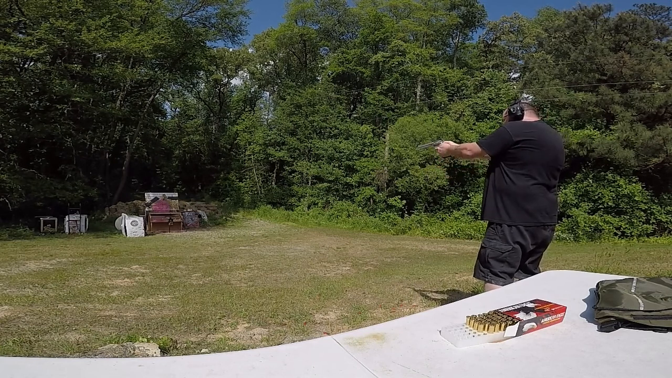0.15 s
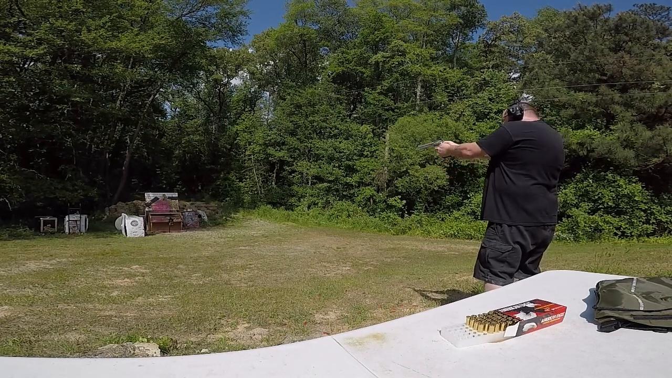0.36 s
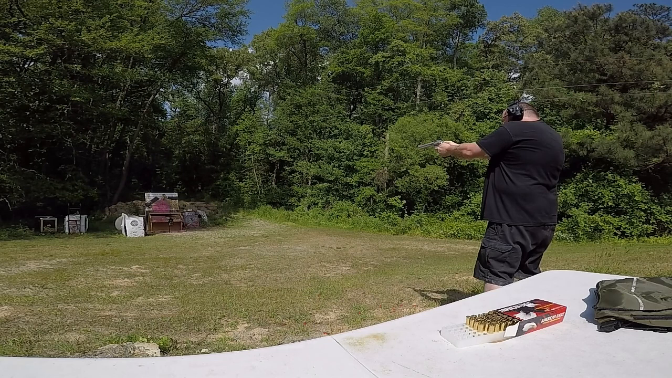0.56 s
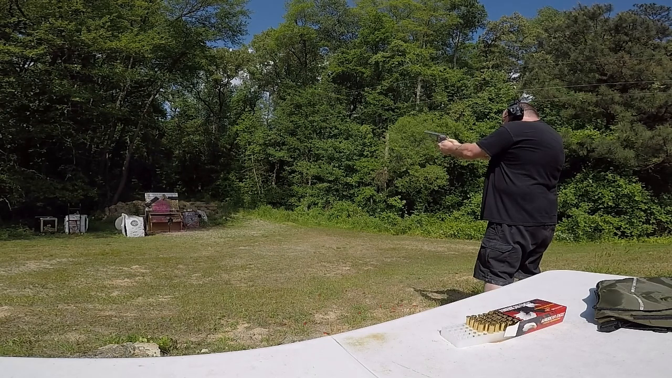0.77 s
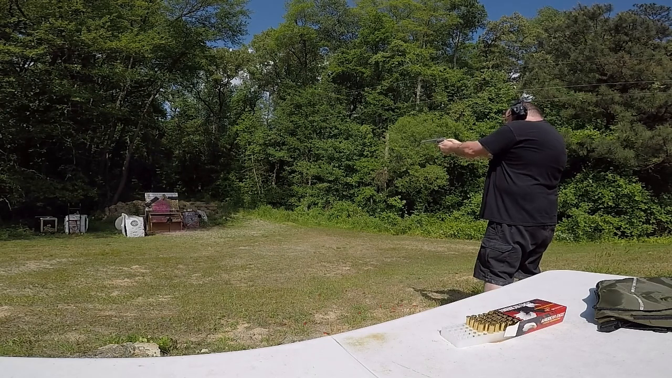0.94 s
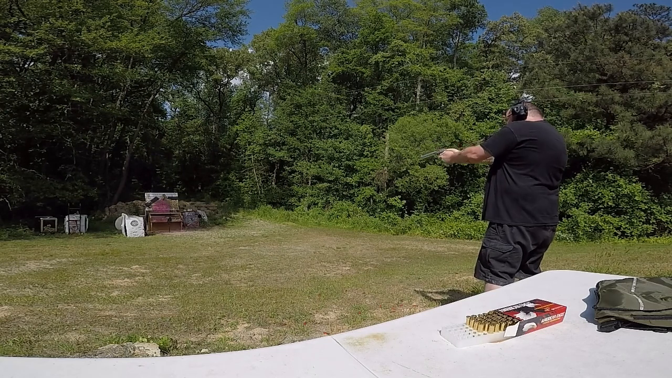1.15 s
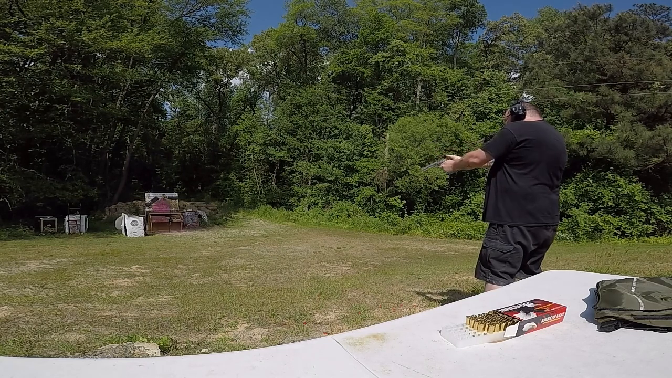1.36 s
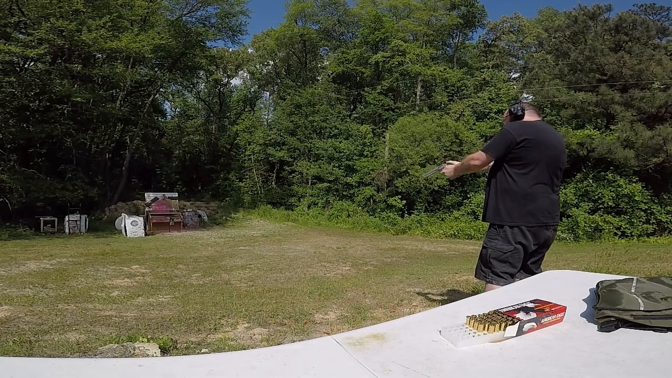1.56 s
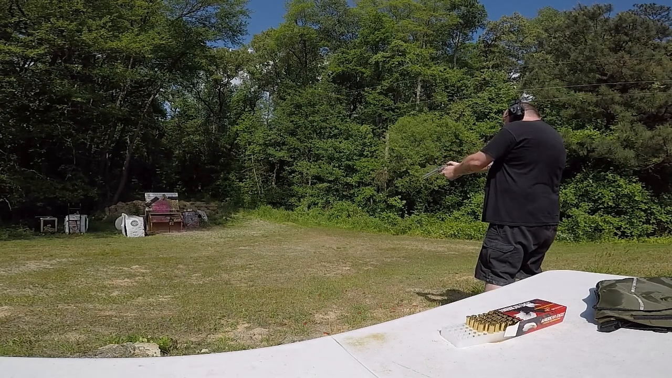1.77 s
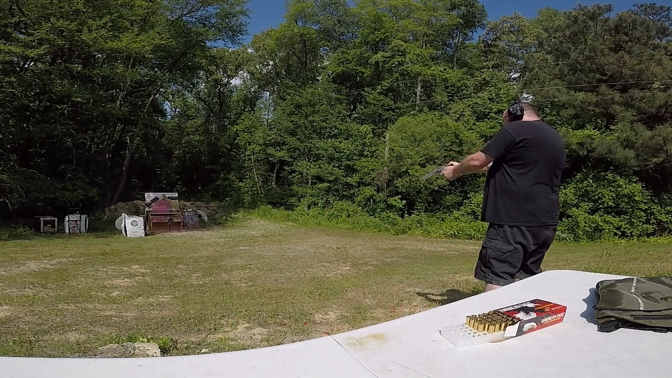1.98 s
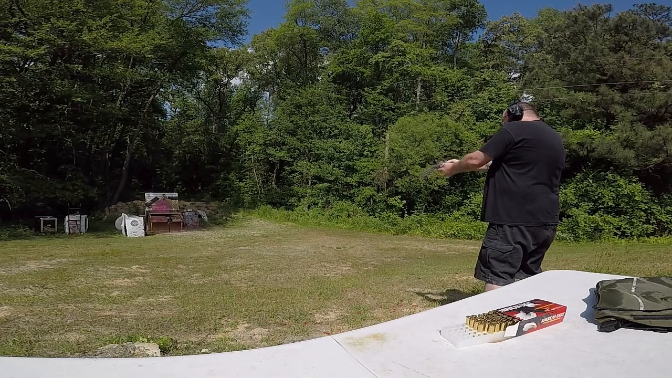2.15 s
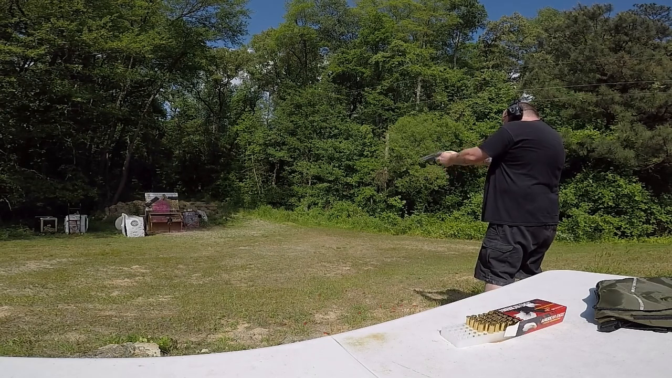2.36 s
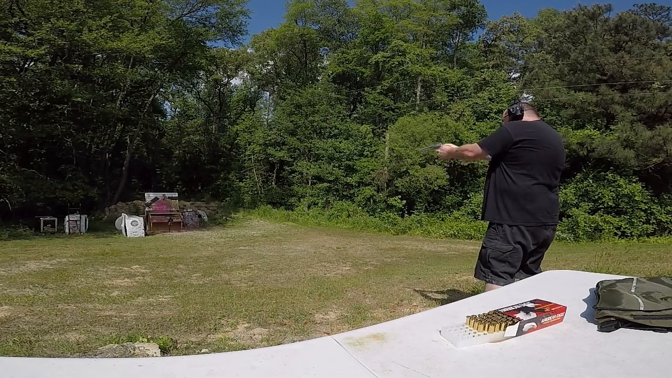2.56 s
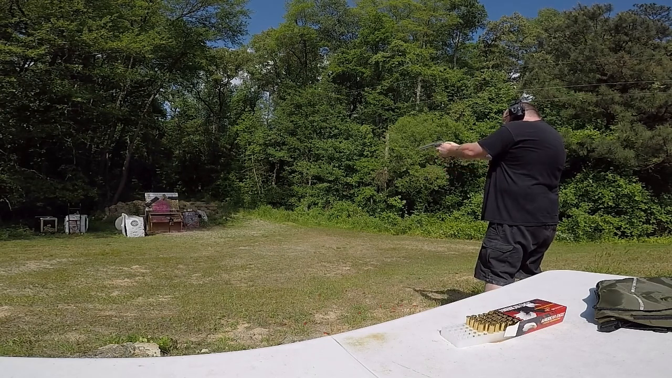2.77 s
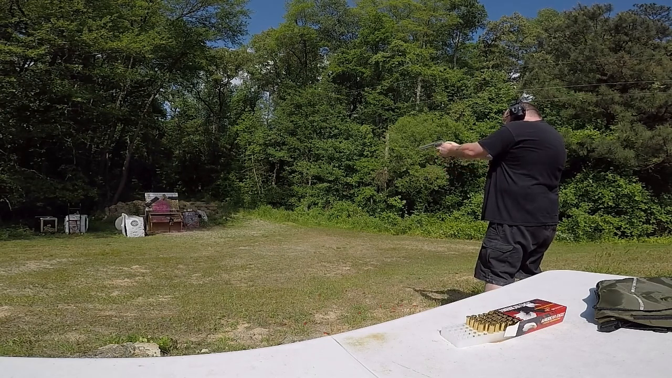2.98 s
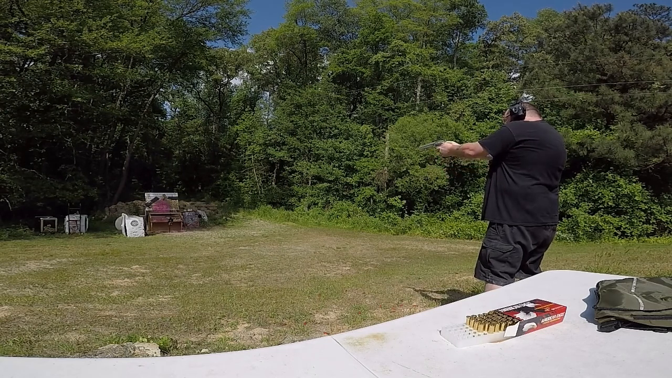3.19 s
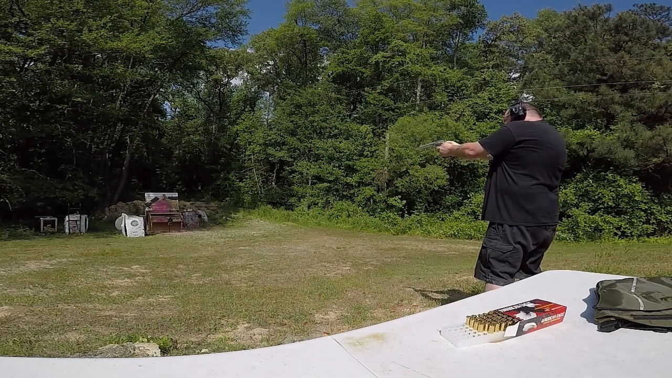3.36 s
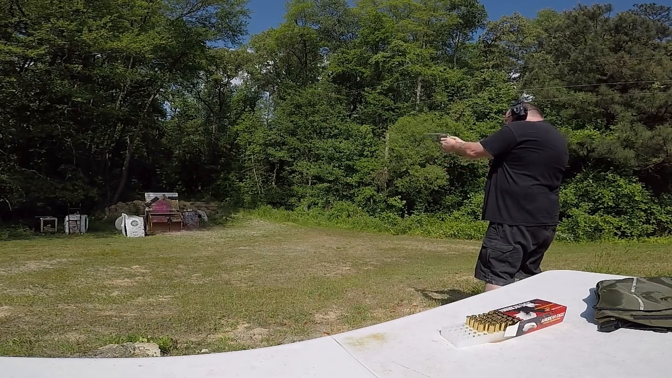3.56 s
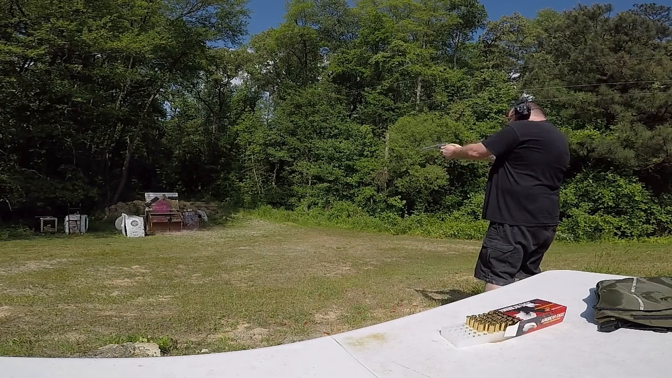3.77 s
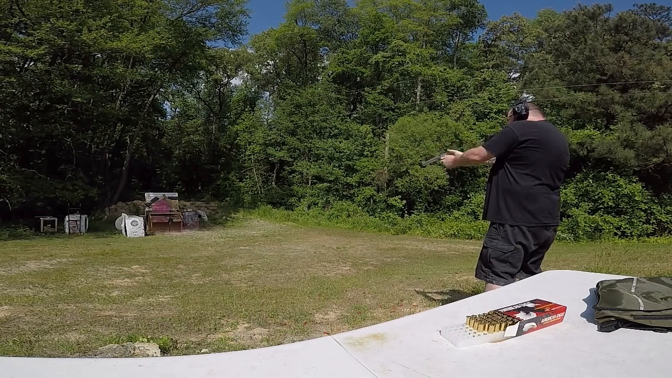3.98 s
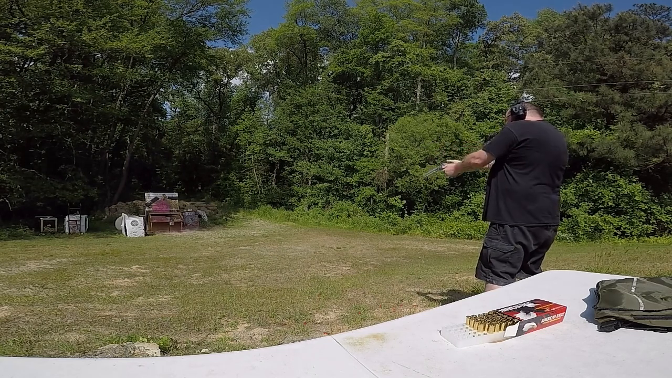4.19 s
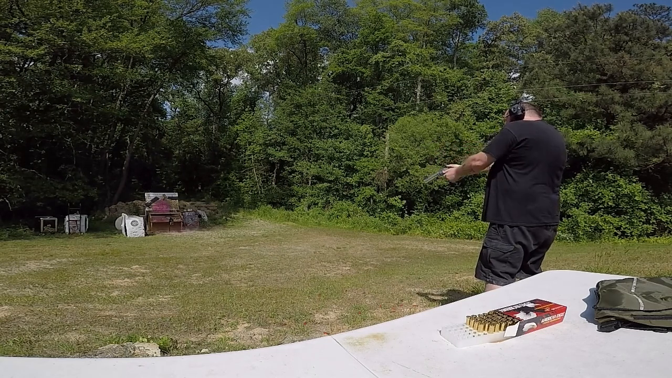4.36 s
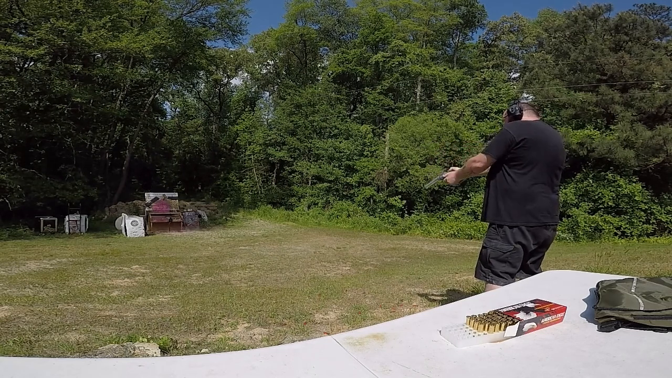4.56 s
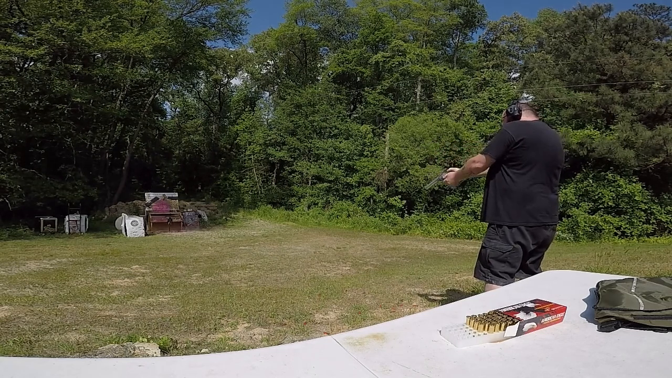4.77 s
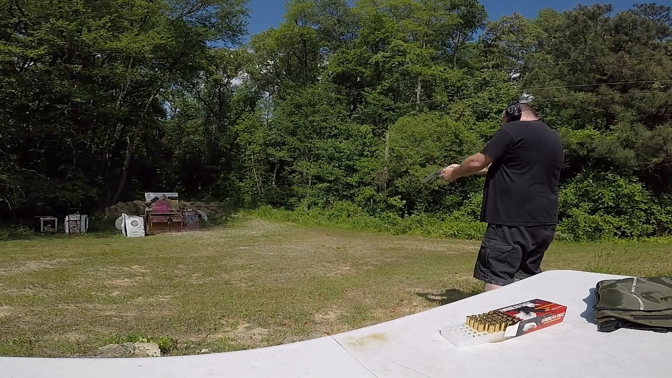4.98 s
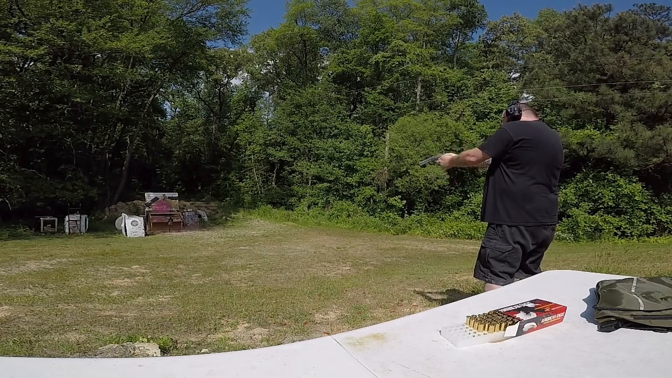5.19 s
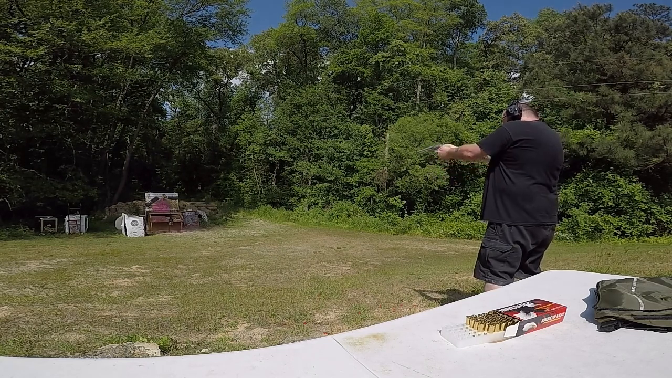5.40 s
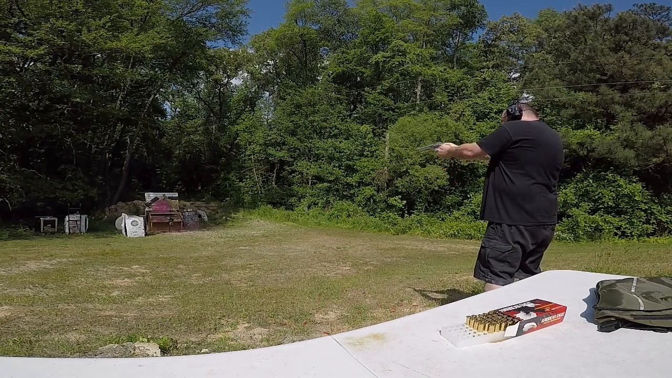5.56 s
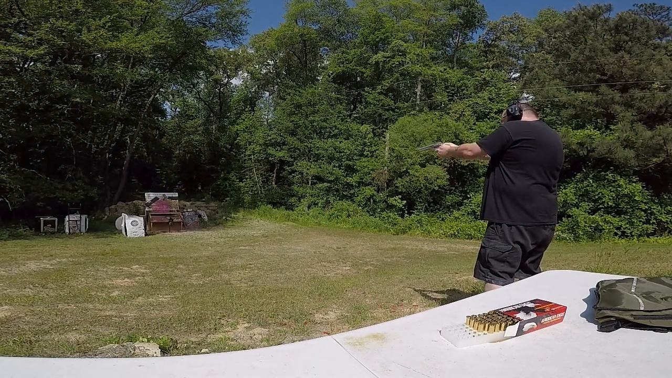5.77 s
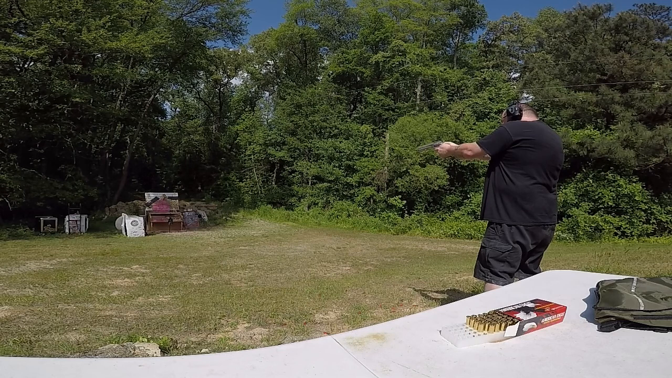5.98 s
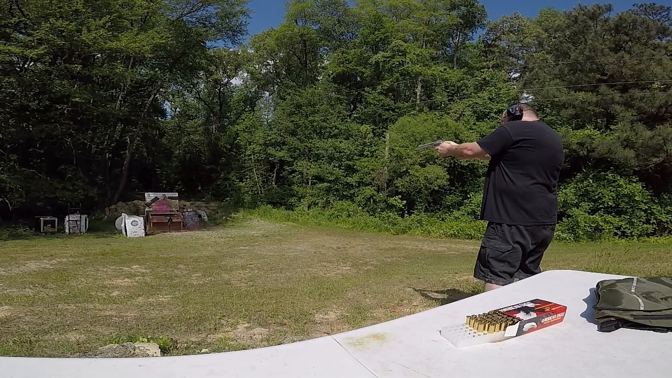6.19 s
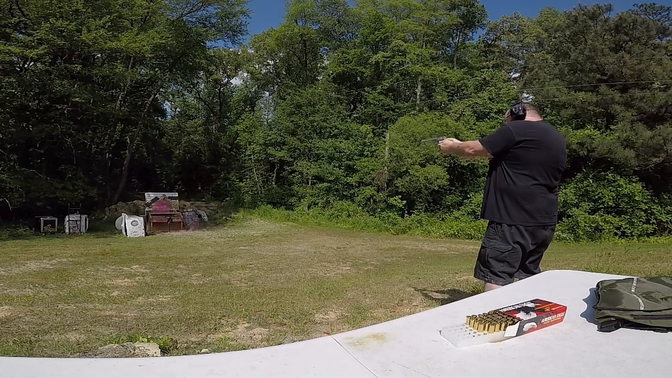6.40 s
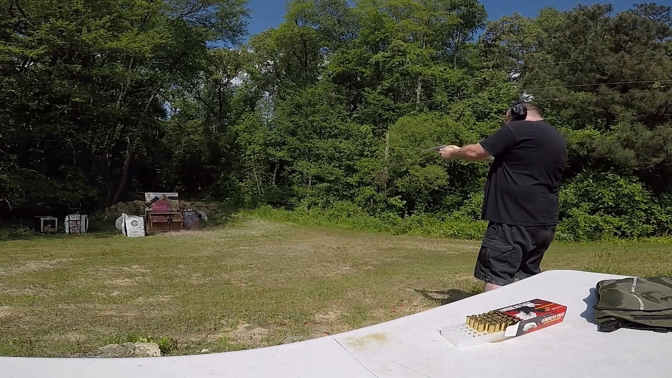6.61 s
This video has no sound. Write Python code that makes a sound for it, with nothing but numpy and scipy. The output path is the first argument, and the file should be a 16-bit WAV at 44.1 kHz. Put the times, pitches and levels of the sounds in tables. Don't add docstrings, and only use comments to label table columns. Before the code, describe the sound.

Three loud revolver shots outdoors, each followed by a bullet smacking a hanging steel plate that rings and wavers while the woods echo.

```python
import sys
import numpy as np
from scipy import signal
from scipy.fft import rfft, irfft, next_fast_len
from scipy.io import wavfile
from scipy.ndimage import uniform_filter1d, map_coordinates

SR = 44100
rng = np.random.default_rng(int(sys.argv[2]) if len(sys.argv) > 2 else 0)


def gain_from_db(level_db):
    decades = np.asarray(level_db, float) / 20
    return 10 ** decades


def master(y):
    cut = np.clip(np.atleast_2d(y).T, -1, 1)
    pcm = np.round(cut * 32767)
    wavfile.write(sys.argv[1], SR, pcm.astype(np.int16))


N = 292824


def unit(x):
    return x / np.sqrt(np.mean(x ** 2) + 1e-20)


def along(points, hz):
    f, v = np.transpose(points)
    return np.interp(np.log(hz + 1), np.log(f + 1), v)


def curves(rows, t, quiet=-120):
    s, *columns = np.transpose(rows)
    return [np.interp(t, s, column, quiet, quiet) for column in columns]


def filtered(x, response):
    m = next_fast_len(len(x) + SR)
    hz = np.fft.rfftfreq(m, 1 / SR)
    return irfft(rfft(x, m) * response(hz), m)[:len(x)]


def noise(spectrum, size=N):
    white = rng.standard_normal(size)
    return unit(filtered(white, lambda hz: gain_from_db(along(spectrum, hz))))


def wobble(rate, size=N):
    knots = rng.standard_normal(int(size * rate / SR) + 4)
    return map_coordinates(knots, [np.arange(size) * rate / SR])


def swells(rows, t):
    out = np.zeros(len(t))
    for peak_s, db, rise_s, fade, *bend in rows:
        late = t - peak_s
        loss_db = np.where(late < 0, 10 * (late / rise_s) ** 2, fade * late + sum(bend) * late ** 2)
        out += gain_from_db(db - loss_db)
    return out


def add(track, s, sound):
    part = track[round(s * SR):][:len(sound)]
    part += sound[:len(part)]


# t/s after shot, crackle level/dB, hold/s, suction [0-4 of full scale]
BLAST_WAVES = [
    (0, 11.5, .0032, 2.5),
    (.0055, 1, .001, 2),
    (.0092, -1, .003, 1.15),
    (.0125, -4, .002, .3),
    (.0155, -8, .004, .6),
    (.0205, -12, .002, .5),
    (.0235, -20, .006, .25),
    (.03, -23, .012, .08),
    (.043, -32, .024, 0),
    (.052, -27, .002, 0),
]
# f/Hz, level/dB per Hz
CRACKLE_COLOUR = [(100, -40), (300, -11), (700, -3), (1700, -3), (2900, -8.5), (3900, 0), (5500, -10.5),
                  (9000, -14), (15000, -24)]


def blast():
    fade_db_per_s, suck_lag_s, suck_width_s = 7500, .002, .0007
    t = np.arange(SR // 10) / SR
    s, db, hold_s, suck = np.transpose(BLAST_WAVES)[..., None]
    fade_db = fade_db_per_s * np.clip(t - s - hold_s, 0, 1)
    crackle = np.max((t >= s) * gain_from_db(db - fade_db), axis=0)
    from_middle = (t - s - hold_s / 2 - suck_lag_s) / (suck_width_s + hold_s / 6)
    suction = np.sum(suck * np.exp(-.5 * from_middle ** 2), axis=0)
    bright = noise(CRACKLE_COLOUR, size=len(t))
    dull = unit(filtered(bright, lambda hz: 1 / (1 + (hz / 3500) ** 2)))
    fresh = 0.45 + 0.61 * np.exp(-t / 0.0066)
    return gain_from_db(-3.0) * crackle * (fresh * bright + (1 - fresh) * dull) - suction


# t/s after strike, level/dB
SLAP_TAPS = [
    (0, -3),
    (.0005, -1),
    (.0032, -4),
    (.0037, -3),
    (.0128, -11),
]
# f/Hz, width/Hz, level/dB
SLAP_TONES = [(2050, 1100, 0), (3800, 900, -6), (6400, 1500, -13), (9000, 2000, -21), (12000, 2000, -27)]


def strike(thump_db):
    t = np.arange(SR // 20) / SR
    taps = np.zeros(len(t))
    for s, db in SLAP_TAPS:
        taps[round(s * SR)] = gain_from_db(db + rng.normal(0, 1))

    def steel_tones(f):
        total = 0
        for k, (centre, width, db) in enumerate(SLAP_TONES):
            resonance = -1j * f * width / (centre * centre - f * f + 1j * f * width)
            total = total + (-1) ** k * gain_from_db(db) * resonance
        return total

    slap = filtered(taps, steel_tones)
    push = gain_from_db(thump_db) * np.exp(-.5 * ((t - .0037) / .0011) ** 2)
    return .75 * slap / np.abs(slap).max() - push


MAIN_HZ = [1877, 3079, 3692]
# level/dB, t60/s, lobes per s, first lobe [turns], flash level/dB
MAIN_TONES = [
    [(-30.5, 5.17, 5.364, 0.61, -21), (-31.5, 2.58, 4.23, 0.45, -25), (-22, 1.55, 2.46, 0.98, -41)],
    [(-31, 4.7, 5.1, 0.42, -25.5), (-31, 2.08, 6.67, 0.88, -25), (-35.5, 2.2, 3.8, 0.18, -30)],
    [(-33, 3.5, 0.85, 0.115, -35), (-43, 2.8, 1.5, 0.37, -45), (-57, 3.5, 8, .5, -39)],
]
MAIN_SLOWS_S = [0.5, 4.7, 6]
MAIN_DEPTH = [.93, .75, .7]
OTHER_HZ = [1134, 2561, 3269, 3890, 4997, 5069, 5636, 6145, 6497, 6647, 7292, 7688, 8102, 8335, 8786, 9040,
            9722, 10230, 10910, 11372, 11463, 12000, 12165, 13320, 14055, 10705, 12769, 13119]
# t60/s, lobes per s, flash level/dB
OTHER_TONES = [(0.66, 4.3, -80.0), (3.6, 2.3, -46), (1.05, 2.6, -80.0), (2.15, 2.4, -32.5),
               (1.74, 1.44, -28.5), (1.7, 2.5, -26.5), (0.92, 2, -18), (0.87, 1.5, -48), (3.7, 1.2, -32),
               (2.3, 4.3, -46.5), (1.5, 1.5, -22), (0.46, 2.8, -21.5), (1.5, 1.5, -35), (3.2, 2.4, -55.0),
               (1.35, 3.7, -33), (1.19, 2.15, -80.0), (0.61, 3.9, -30), (0.47, 1.9, -80.0), (0.4, 5.2, -55),
               (1.1, 4.2, -50), (0.84, 2.1, -34), (0.45, 1.5, -80.0), (0.6, 3.0, -80.0),
               (0.67, 11.0, -48.0), (0.8, 1.5, -80.0), (1.7, 2.9, -80.0), (0.3, 11.0, -80.0),
               (2.0, 1.5, -80.0)]
# level/dB at hit 1, 2, 3
LANDING = [(-46, -72.0, -22), (-52.0, -48.0, -36.0), (-72.0, -36.5, -35.5), (-39, -36.0, -50),
           (-40.5, -41, -39), (-38.5, -54, -35), (-74, -53, -34.5), (-53, -48, -42), (-59.5, -60.0, -55.5),
           (-70, -81, -53), (-49, -52, -39), (-72.0, -43, -25), (-55, -60.0, -48.0), (-63, -72.0, -52),
           (-62, -53, -50), (-36, -55, -37.5), (-68.0, -68.0, -26), (-24, -35, -30), (-39, -52.0, -36),
           (-66, -60.0, -50), (-56, -39.5, -34), (-23, -72.0, -32), (-60, -60.0, -56.0),
           (-64.0, -68.0, -44.0), (-45, -72.0, -50), (-64, -72.0, -56), (-60.0, -56.5, -40.0),
           (-68.0, -72.0, -72.0)]
FACING = [(0.92, 0.0, 0.67), (0.64, 0.29, 0.85), (0.875, 0.13, 0.94), (0, 0.21, 0.75), (0.79, 0.84, 0.31),
          (0.077, 0.047, 0.61), (0.625, 0.125, 0.24), (0.043, 0.75, 0.72), (0.19, 0.0, 0.25),
          (0.0, 0.125, 0.31), (0.8, 0.63, 0.66), (0.875, 0.0, 0.69), (0.45, 0.375, 0.125),
          (0.17, 0.25, 0.875), (0.625, 0.41, 0.77), (0.93, 0.75, 0.043), (0.875, 0.25, 0.86),
          (0.58, 0.375, 0.71), (0.0, 0.75, 0.99), (0.5, 0.75, 0.73), (0.5, 0.0058, 0.72),
          (0.75, 0.625, 0.625), (0.25, 0.125, 0.75), (0.75, 0.5, 0.625), (0.875, 0.875, 0.125),
          (0.0, 0.0, 0.0), (0.875, 0.25, 0.125), (0.75, 0.75, 0.75)]
FLASH_DB = [2.5, 3.5, -5.5]


def ring(hit, flash_s):
    twist_slows_s, lobe_depth = 0.45, 0.66
    lobe_point = 0.72
    flash_follows = 0.87
    rest_s, rest_fade_db_per_s = 1.12, 10
    flutter_db_per_khz, flutter_top_db, flutter_per_s = 1.6, 4.5, 20

    other_t60, other_lobes, other_flash_db = np.transpose(OTHER_TONES)
    landing_db = np.transpose(LANDING)[hit]
    weakness_db = np.maximum(landing_db - np.max(LANDING, axis=1), -20)
    other_flash_db = other_flash_db + FLASH_DB[hit] + flash_follows * weakness_db
    others = np.transpose([landing_db, other_t60, other_lobes, np.transpose(FACING)[hit], other_flash_db])
    modes = np.vstack([MAIN_TONES[hit], others])
    pitches_hz = MAIN_HZ + OTHER_HZ

    t = np.arange(0, 19 * SR // 10, 10) / SR
    db, t60, lobes, facing, flash_db = np.transpose(modes)[..., None]
    slows = np.r_[MAIN_SLOWS_S, np.full(len(OTHER_HZ), twist_slows_s)][:, None]
    twist = slows * np.log(1 + t / slows)
    twist[0] = np.minimum(twist[0], np.interp(rest_s, t, twist[0]))
    depth = np.r_[MAIN_DEPTH, np.full(len(OTHER_HZ), lobe_depth)][:, None]
    beam = np.abs(1 + depth * np.exp(2j * np.pi * (lobes * twist - facing))) / (1 + depth)
    flutter = []
    for hz in pitches_hz:
        flutter_db = min(abs(hz - MAIN_HZ[0]) / 1000 * flutter_db_per_khz, flutter_top_db)
        flutter.append(flutter_db * np.minimum(wobble(10 * flutter_per_s, size=len(t)), 1))
    fade = 60 * t / t60 + rest_fade_db_per_s * np.clip(t - rest_s, 0, 9)
    body = gain_from_db(db - fade + flutter) * beam ** lobe_point * (1 - np.exp(-t / .015))
    flash = gain_from_db(flash_db) * np.exp(-.5 * ((t - flash_s) / .024) ** 2)
    gain = np.repeat(np.hypot(body, flash) * np.clip(t / .0027, 0, 1), 10, axis=1)
    turns = np.outer(pitches_hz, np.arange(gain.shape[1]) / SR) + rng.random((len(modes), 1))
    return np.sum(gain * np.sin(2 * np.pi * turns), axis=0)


# t/s after shot, level/dB
SPRAY = [
    (.0675, -42),
    (.07, -19),
    (.1, -27),
    (.14, -26),
    (.2, -32.5),
    (.3, -39),
    (.45, -42.5),
    (.6, -46),
]
SPLASH_DB = [1, 1, 1.5]
# loudest t/s after shot, level/dB, rise/s, fade [dB per s], bend [dB per s squared]
NEAR_TREES = [
    (.12, -37, 0.022, 17, 0),
    (.7, -39, 0.16, 14.5, 5),
    (1.2, -52, 0.15, 15, 3),
]
FAR_TREES = [
    (.12, -40.5, .04, 23, 2.5),
    (.8, -40.5, 0.3, 0.81, 10.5),
]
# f/Hz, level/dB per Hz
SPRAY_COLOUR = [(35, -66), (60, -1.5), (294, -0.5), (803, -4.5), (1580, -9), (1910, -10.5), (2770, -9.5),
                (4970, -7.5), (6900, -21), (11800, -18.5), (14600, -28.5), (16000, -47)]
NEAR_COLOUR = [(59, -20), (100, -14), (343, 0), (1310, -6.5), (1830, -3.5), (2860, -10), (3780, -8),
               (5900, -17.5), (9210, -19), (11900, -34.5), (16000, -66)]
FAR_COLOUR = [(71, -78), (120, -41.5), (155, -27.5), (330, -2), (568, 3.5), (1700, -16.5), (1930, -16.5),
              (2000, -23), (2600, -52), (4400, -120)]


def woods(steel, hit):
    size = 3 * SR
    t = np.arange(size) / SR
    near, far = swells(NEAR_TREES, t), swells(FAR_TREES, t)

    def ringing(colour):
        return unit(filtered(noise(colour, size=size), steel))

    trunks = gain_from_db(1.05 * wobble(25, size=size))
    spray_gain = gain_from_db(curves(SPRAY, t)[0] + SPLASH_DB[hit] + 0.4 * wobble(150, size=size))
    spray = spray_gain * dulled(ringing(SPRAY_COLOUR), since=0.11)
    near_echo = near * dulled(ringing(NEAR_COLOUR), since=0.2)
    far_echo = far * trunks * noise(FAR_COLOUR, size=size)
    return (t > .0675) * (spray + near_echo + far_echo)


def minor_modes(depth_db):
    spikes = depth_db * wobble(SR / 45 / 2, size=SR)
    return lambda hz: gain_from_db(np.interp(hz, np.arange(SR) / 2, spikes) * np.clip(hz / 6000, 0, 1))


# f/Hz, level/dB per s
AIR_LOSS = [(300, 16), (1000, 3), (2500, 10.5), (5000, 15.5), (8000, 40), (11000, 52), (15000, 102)]


def dulled(x, since):
    hz, frames, z = signal.stft(x, SR, nperseg=512)
    loss_db = along(AIR_LOSS, hz)[:, None] * (frames - since)
    return signal.istft(z * gain_from_db(-loss_db), SR, nperseg=512)[1][:len(x)]


# t/s, peak level/dB, body level/dB
CLICKS = [
    (1.807, -40, -13),
    (1.842, -39, -4),
    (1.8615, -21, -4.5),
    (4.522, -41.5, -11),
    (4.5644, -40, -8),
    (4.585, -28, -1.5),
    (5.1727, -53, 3),
]
# f/Hz, level/dB, t60/s
LOCK_TONES = [(2580, 5.5, 0.0038), (4260, 9, 0.0057), (4720, 5, .007), (6330, -16, 0.017),
              (8030, -7, 0.0075), (9700, -7.5, 0.013), (11700, -11, .007), (13100, -10, 0.0053)]


def hammer():
    rattle_colour = [(1500, -20), (4500, 0), (10000, -4), (15000, -20)]  # f/Hz, level/dB per Hz
    out, t = np.zeros(N), np.arange(SR // 20) / SR
    for s, db, body_db in CLICKS:
        tick = np.zeros(len(t))
        for hz, level, t60 in LOCK_TONES:
            weight_db = level + rng.normal(0, 2) + body_db * (hz < 5500)
            tick += gain_from_db(weight_db - 60 * t / t60) * np.sin(2 * np.pi * (hz * t + rng.random()))
        snap = 0.37 * gain_from_db(-60 * t / 0.0047)
        tail = .07 * gain_from_db(-60 * t / .08)
        rattle = (snap + tail) * noise(rattle_colour, size=len(t))
        add(out, s, gain_from_db(db - 4.0) * (tick * (1 - np.exp(-t / 0.00056)) + rattle))
    return out


HUM_HZ = [549.1, 936.7, 1645]
# loudest t/s, level/dB, rise/s, fade [dB per s]
HUM_SWELLS = [
    [(.01, -57, .2, 14), (2.19, -67, 0.3, 16), (5.1, -58.5, 0.17, 4.5)],
    [(2.06, -46, 0.067, 25), (4.84, -53.5, .3, 22)],
    [(.35, -68, 0.054, 58.5), (.65, -63.5, 0.055, 64), (1.9, -59, 0.16, 39.5), (4.6, -67.5, .2, 9)],
]


def hum():
    t = np.arange(N) / SR
    return sum(swells(rows, t) * np.sin(2 * np.pi * hz * t) for rows, hz in zip(HUM_SWELLS, HUM_HZ))


# t/s, level/dB
GUSTS = [(.13, -43.5), (.64, -40.5), (1.41, -42.5), (1.8, -34.5), (1.93, -31.5), (2.08, -28.5),
         (2.222, -29), (2.54, -29), (2.68, -31.5), (2.85, -31), (3.14, -34), (3.35, -40.5), (4.14, -45),
         (4.41, -46), (4.84, -32), (5.35, -37), (5.699, -31.5), (6.1, -45.5)]
# f/Hz, level/dB per Hz
BUFFET_COLOUR = [(5.9, -27.5), (10, 16.5), (29, -2.5), (46, -25.5), (71, -29.5), (156, -50), (200, -45),
                 (260, -69.5), (440, -120)]
# f/Hz, level/dB per Hz
FLOOR_COLOUR = [(35, -35.5), (60, 1), (193, -9.5), (492, -3), (553, -8.5), (607, -4), (1660, -17),
                (1860, -19), (4640, -21.5), (6000, -29.5), (13300, -34), (14900, -36), (16000, -52.5)]


def air():
    rise_s, fade_db_per_s, calm_db = 0.11, 108, -63.5
    t = np.arange(N) / SR
    gusts = swells([(s, db, rise_s, fade_db_per_s) for s, db in GUSTS], t) + gain_from_db(calm_db)
    duck_db = sum(-11 * (t > shot[0]) / (1 + np.exp((t - shot[0] - .95) / .12)) for shot in SHOTS)
    buffet = noise(BUFFET_COLOUR)
    buffet /= np.sqrt(np.abs(uniform_filter1d(buffet ** 2, size=6000)) + 0.19)
    hush = gain_from_db(-58 + duck_db + 0.83 * wobble(4.1)) * noise(FLOOR_COLOUR)
    return gusts * buffet + hush


# t/s, strike delay/s, strike thump level/dB, first swing t/s after strike
SHOTS = [
    (.7207, .0652, -22, .055),
    (3.4471, .0648, -3, .042),
    (6.2384, .0652, -12, .022),
]


def scene():
    out = air() + hammer() + hum()
    steel = minor_modes(depth_db=4)
    for hit, (s, delay_s, thump_db, flash_s) in enumerate(SHOTS):
        add(out, s, blast())
        add(out, s, woods(steel, hit))
        add(out, s + delay_s, strike(thump_db))
        add(out, s + delay_s + .008, ring(hit, flash_s))
    return out[None]


def roll_off(x):
    return signal.sosfilt(signal.butter(12, 16510, fs=SR, output="sos"), x)


def record(dry):
    held = dry[0] / (1 + np.abs(dry[0] / 1.15) ** 4) ** (1 / 4)
    coupled = filtered(held, lambda hz: 1j * hz / (1.4 + 1j * hz))
    clipped = coupled / (1 + np.abs(coupled / .84) ** 8) ** (1 / 8)
    sampled = filtered(clipped, lambda hz: 1 / (1 + (hz / 15300) ** 120))
    return roll_off(sampled[None])


dry = scene()
out = record(dry)
master(out)
```